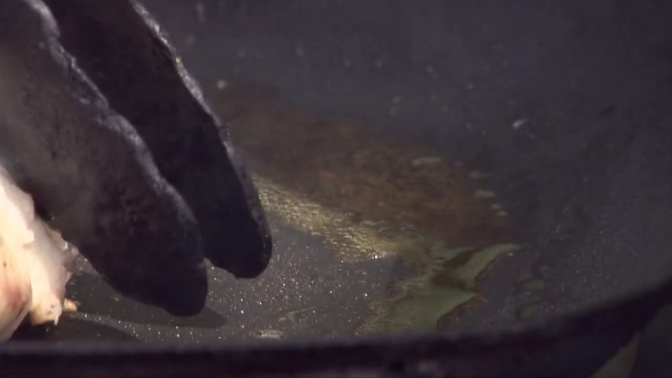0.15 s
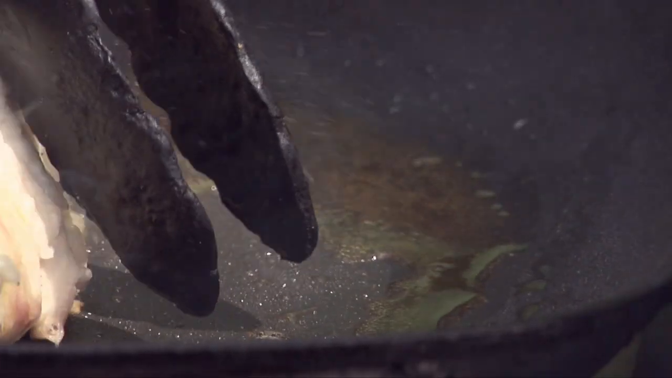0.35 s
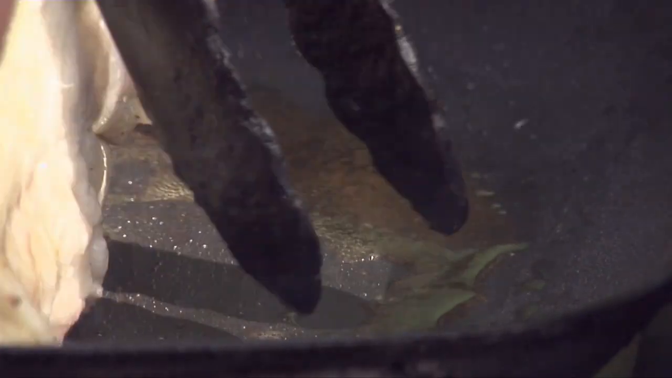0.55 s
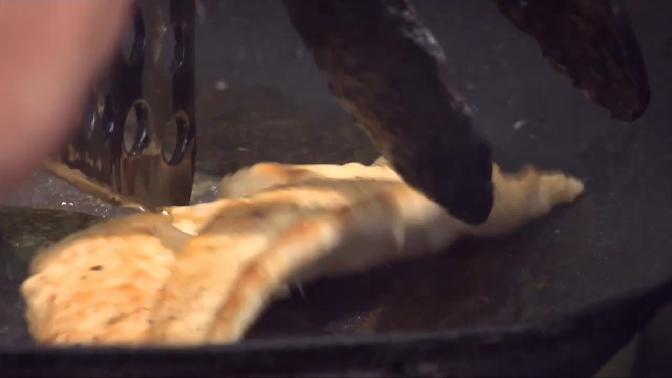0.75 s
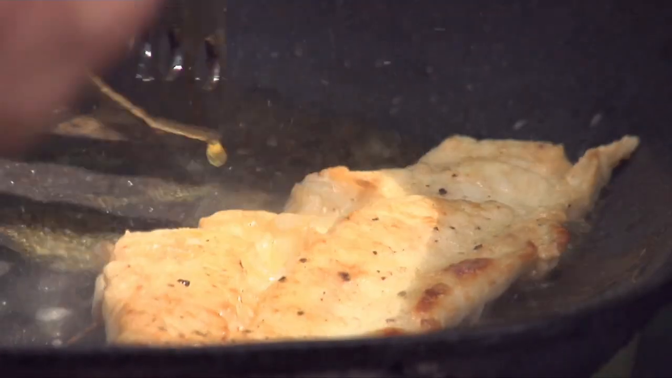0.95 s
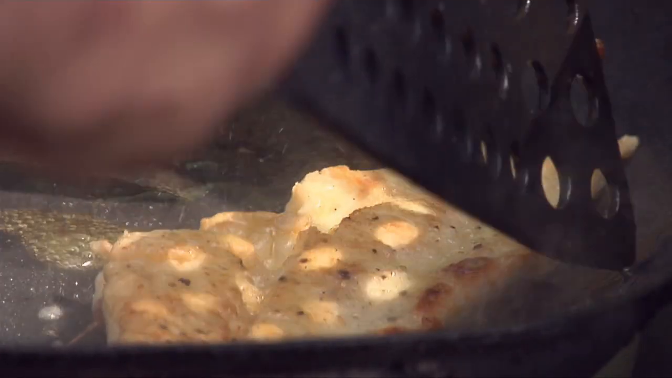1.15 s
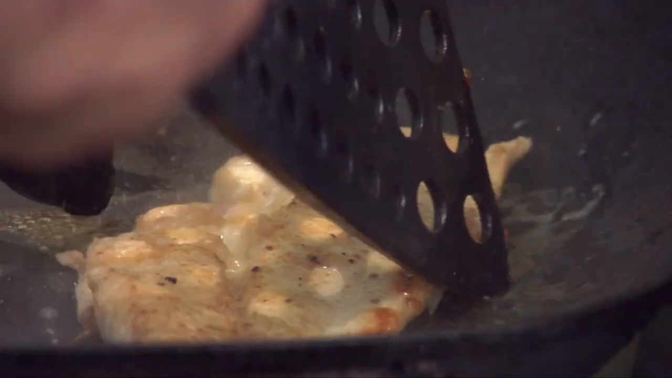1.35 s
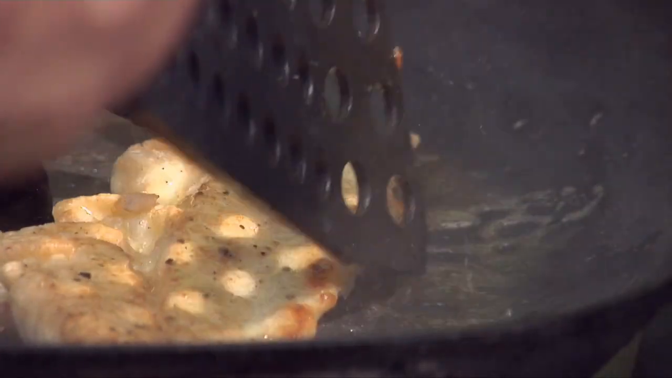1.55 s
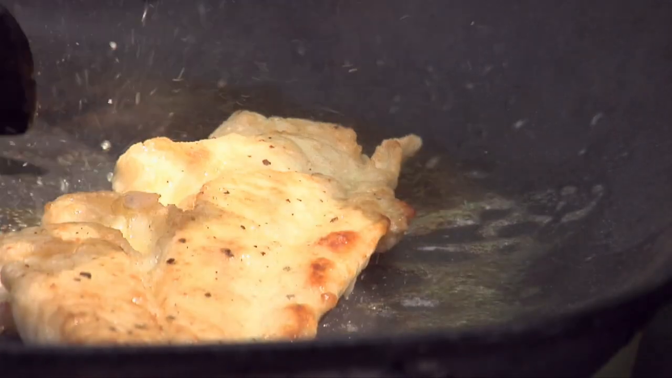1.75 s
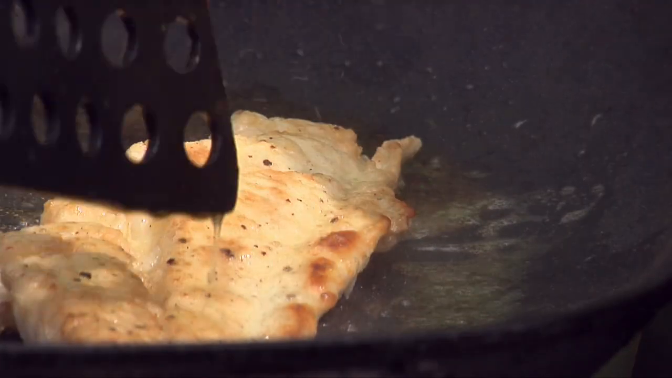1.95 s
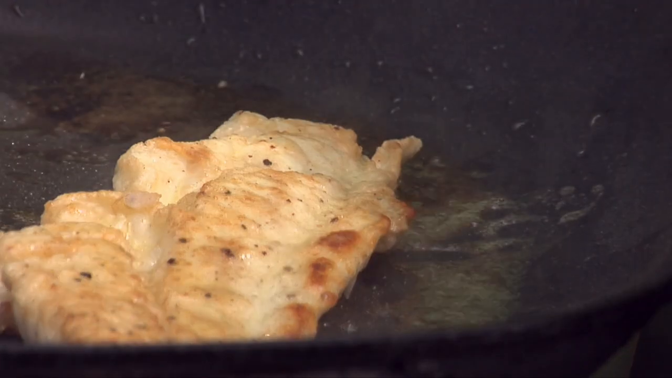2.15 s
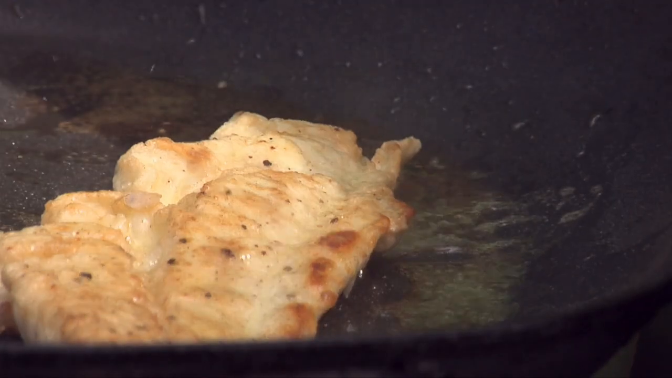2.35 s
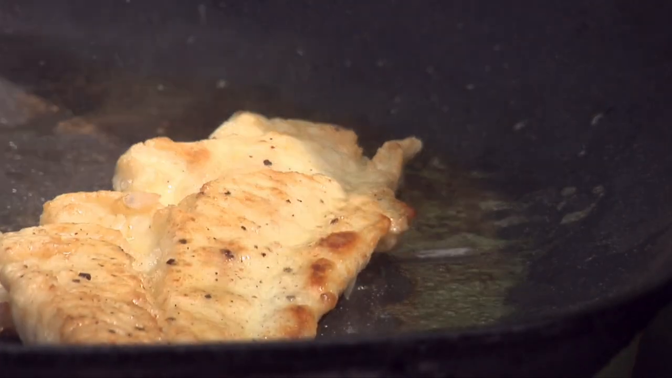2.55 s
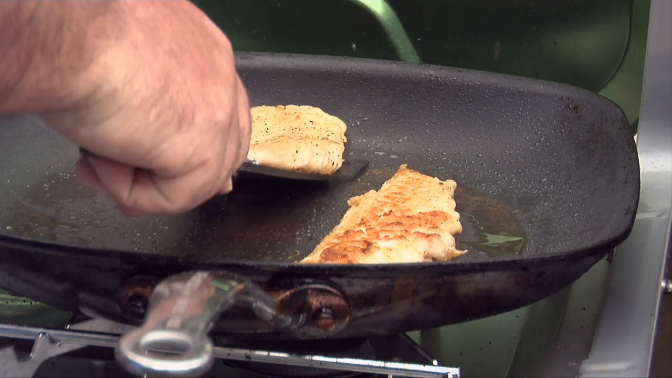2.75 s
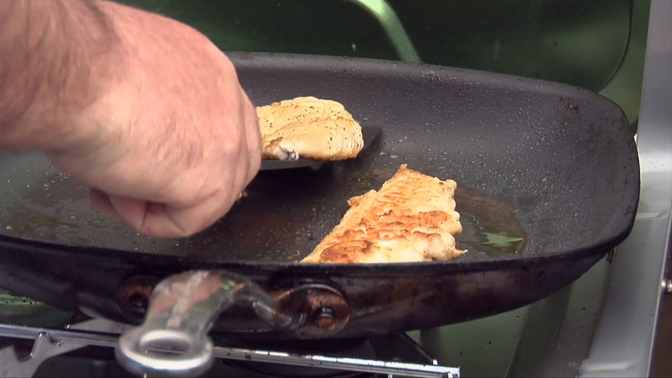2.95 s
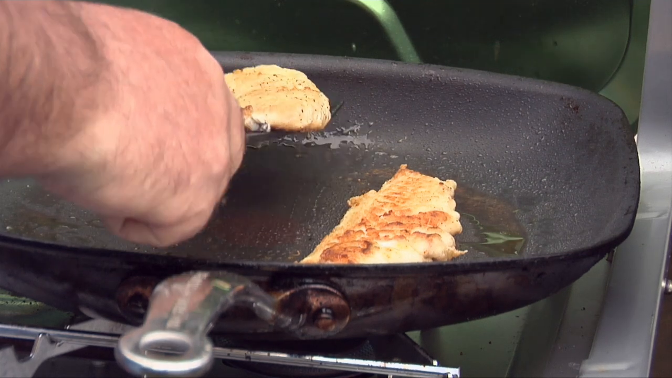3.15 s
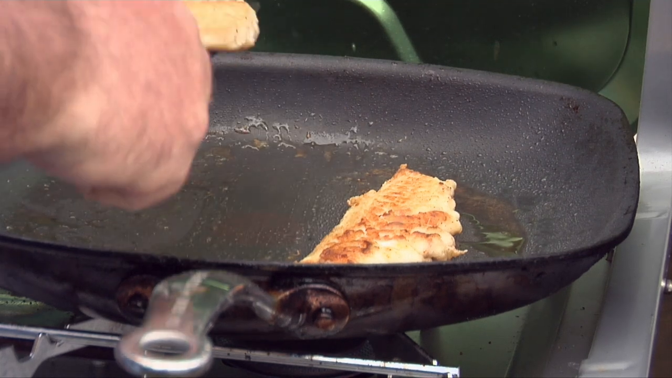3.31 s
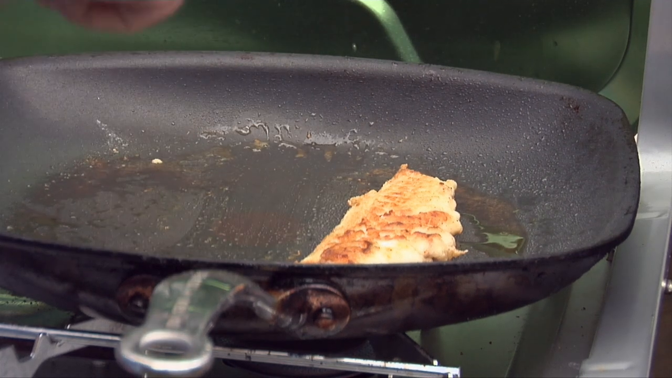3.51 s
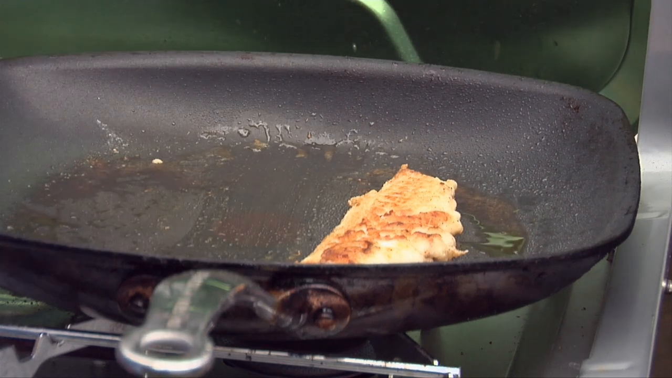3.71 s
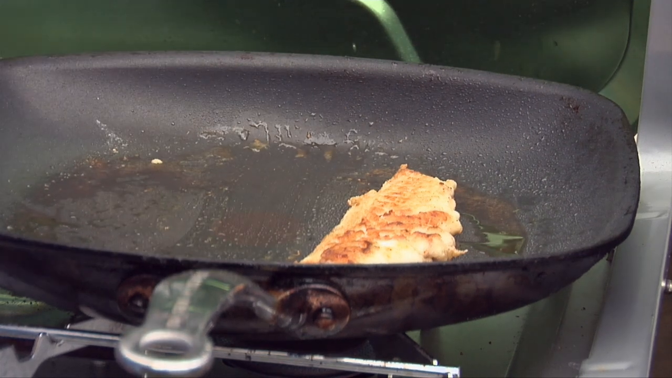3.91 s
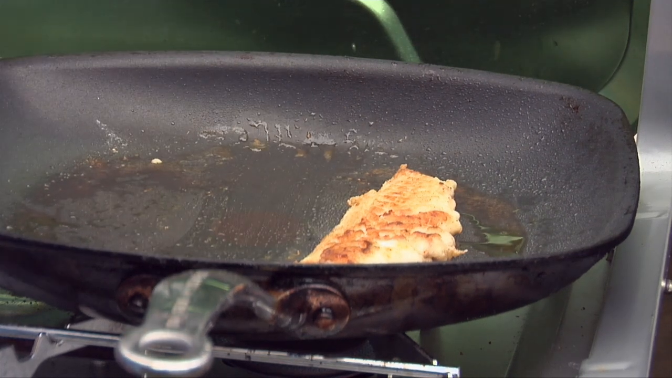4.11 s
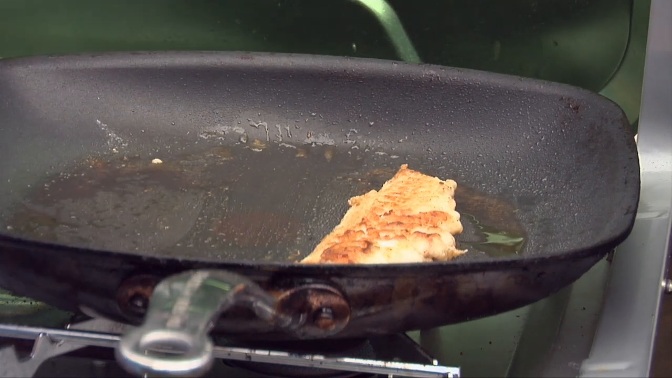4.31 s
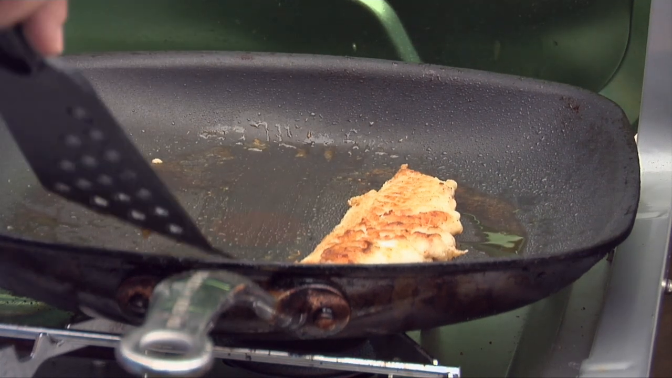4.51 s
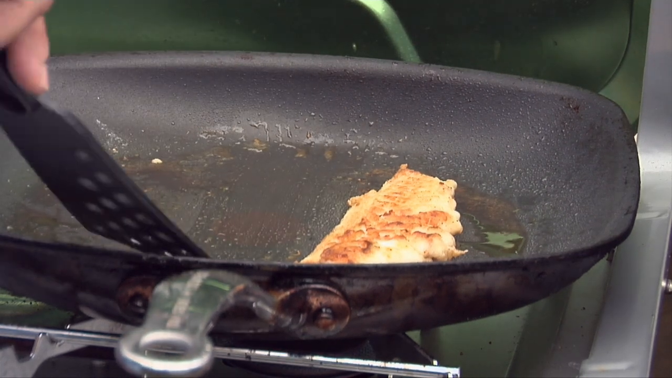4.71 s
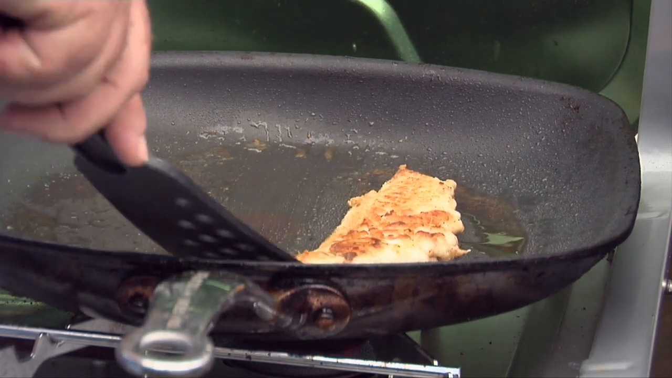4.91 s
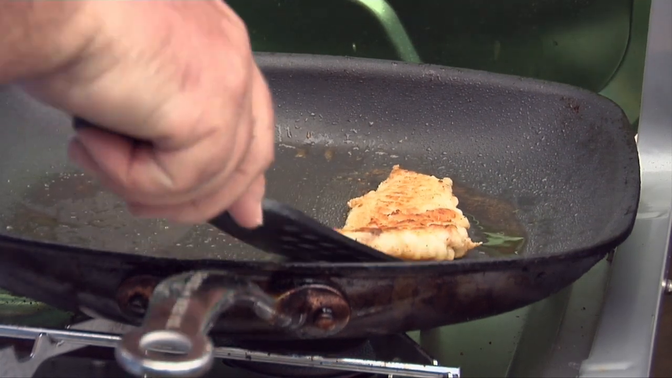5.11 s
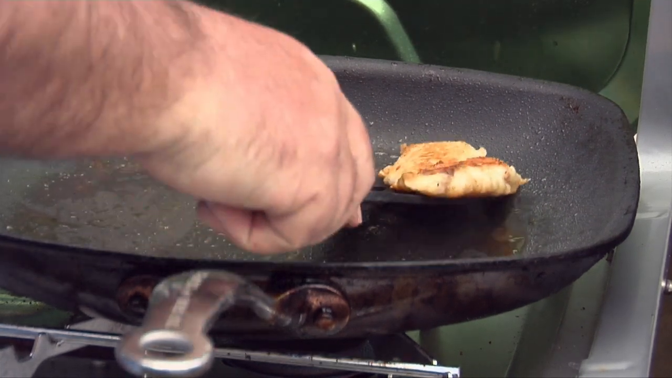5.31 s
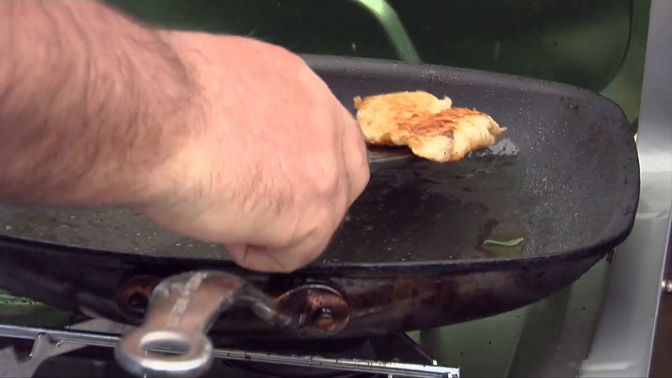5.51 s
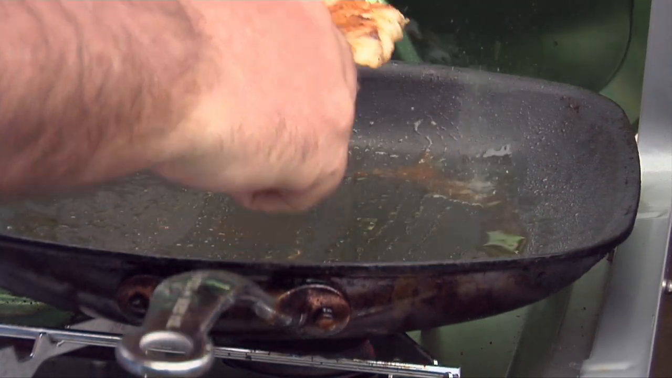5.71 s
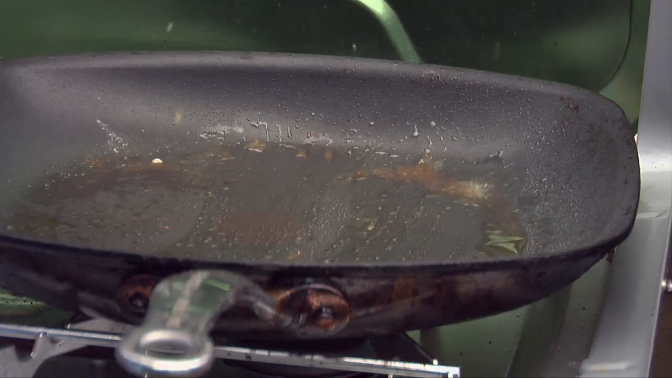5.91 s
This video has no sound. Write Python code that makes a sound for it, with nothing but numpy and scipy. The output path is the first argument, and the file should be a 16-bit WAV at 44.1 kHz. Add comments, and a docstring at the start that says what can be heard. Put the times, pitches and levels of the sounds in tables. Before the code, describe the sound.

Fish sizzles in hot oil from the start, very close, a dense bright hiss above the low roar of a gas flame. Sharp snaps and tiny steam chirps come around 0.5 seconds. At 0.8 seconds the sizzle flares loudly as the fillet is turned, stays strong, and swells again near 1.4 and 2.4 seconds.

At about 2.6 seconds the sound shifts abruptly a step back: the flame becomes much quieter and the frying grainier. After a brief flare near 2.9 seconds it settles to a lighter crackle, with frequent pops and snaps of spitting oil. From 4.7 to 5.7 seconds a spatula makes several short, light scrapes on the pan, and the sizzle rises briefly around 5.6 and 5.8 seconds as the fish is lifted. A soft outdoor hiss runs underneath, with faint wind rumbles on the microphone mostly between 3 and 4.5 seconds.

```python
"""A dense sizzle, close by: fish fillets fry in oil and butter in a pan on an outdoor gas stove.
Countless tiny steam bursts make the sound, which flares when a fillet is turned, pressed or lifted.
Drops spit and snap, steam jets chirp, and from a step further back a spatula is heard scraping the pan.
Beneath it the turbulent flame roars, the open air hisses and gusts touch the microphone.
The sharpest snaps duck a limiter."""
import sys
import numpy as np
from scipy import signal
from scipy.fft import rfft, irfft, next_fast_len
from scipy.io import wavfile
from scipy.ndimage import uniform_filter1d, map_coordinates

SR = 44100
rng = np.random.default_rng(int(sys.argv[2]) if len(sys.argv) > 2 else 0)


def digitize_waveform(pressure):
    """Quantize a signal to 16-bit integers and store it at the path in sys.argv[1].

    Rows of a 2-D input are taken as channels; values are limited to [-1, 1].
    """
    field = np.atleast_2d(pressure).T
    bounded = np.clip(field, -1, 1)
    quanta = np.round(bounded * 32767).astype(np.int16)
    wavfile.write(sys.argv[1], SR, quanta)


N = 263277

STEP_BACK_S = 2.645  # the listener moves away from the pan
NEAR_SIMMER_DB, FAR_SIMMER_DB = (-38, -39.5, -42), (-39.5, -45.5, -45)  # oil alone: body, spatter, fizz


# Spectra of the oil, near and far. Each row: frequency in Hz, relative level in dB.
NEAR_OIL_SPECTRUM = [(700, -23.5), (1300, -15), (1650, -7), (2250, -6.5), (2800, -10.5), (3600, -7.5),
                     (4800, -4.5), (6100, -4.5), (7000, -1.5), (8200, -4.5), (10500, -2.5), (13000, -4.5),
                     (15800, -9)]
FAR_OIL_SPECTRUM = [(700, -14.5), (1300, -1.5), (2000, -0.5), (2800, -7), (3600, -2.5), (4600, -1),
                    (5500, -2.5), (7200, 1), (8500, -0.5), (11500, 2), (14000, -2.5), (15800, -6)]
def sizzle():
    """Shot noise: the harder the oil fries, the faster its steam bursts come and the more they merge."""
    body_gain, spatter_gain, fizz_gain = frying_gains()
    vigour = body_gain / amp(by_distance(NEAR_SIMMER_DB[0], FAR_SIMMER_DB[0]))
    bursts_per_s = np.minimum(by_distance(1700, 520) * vigour ** 1.3, 15000)
    bursts = steam_bursts(bursts_per_s)
    near = pan_wall(coloured(bursts, NEAR_OIL_SPECTRUM))
    far = coloured(bursts, FAR_OIL_SPECTRUM)
    sound = by_distance(unit(near), unit(far))
    below = lambda hz, edge_hz: 1 / (1 + (hz / edge_hz) ** 8)
    spatter = filtered(sound, lambda hz: below(hz, 3200))
    fizz = filtered(sound, lambda hz: 1 - below(hz, 9000))
    body = sound - spatter - fizz
    return body_gain * unit(body) + spatter_gain * unit(spatter) + fizz_gain * unit(fizz)


# Moisture meets hot oil as the fish is turned, pressed and lifted. Each row: start, rise and hold
# in seconds, fall in dB per second, level in dB, brightness in dB (more fizz, less spatter).
FLARE_UPS = [(.26, .05, .19, 100, -34, 3), (.62, .18, .02, 60.5, -33, 5), (.818, .015, .025, 45, -22, -1),
             (.82, .08, 1.0, 13, -27.5, -0.5), (1.381, .09, .3, 32, -27, -4),
             (1.92, .07, .04, 70, -29.5, 2.5), (2.37, .16, 0.05, 60, -27.5, -1.2),
             (2.74, .16, .17, 137, -32, -3.3), (5.0, .12, .25, 60.5, -40.5, -5.5),
             (5.433, 0.0402, .12, 60, -43, -10), (5.567, .06, .08, 70, -31, 4),
             (5.779, .08, .1, 62, -34, 4)]
def frying_gains(spatter_db=-9.5, fizz_db=-3.5):
    """Incoherent sources add in power: simmer plus flares, for mid body, low spatter and high fizz."""
    t = clock()
    power = by_distance(amp(NEAR_SIMMER_DB)[:, None], amp(FAR_SIMMER_DB)[:, None]) ** 2
    for start, rise_s, hold_s, fall_db_per_s, db, bright_db in FLARE_UPS:
        attack = np.clip((t - start) / rise_s, 0, 1)
        decay = amp(-fall_db_per_s * np.maximum(t - start - rise_s - hold_s, 0))
        band_gains = amp([db, db + spatter_db - bright_db, db + fizz_db + bright_db])
        power += np.outer(band_gains, attack * decay) ** 2
    return np.sqrt(power)


def steam_bursts(rate):
    """Superposition: bursts and bubbles over a finer hiss, bunched by random amplitude modulation."""
    clumps = amp(0.79 * wobble(160) + 0.11 * wobble(29.63))
    grains = crackle(rate, spread_db=6, life_s=.000077)
    wet = amp(-11) * bubbles(rate / 4, centre_hz=4800, cycles=7.3)
    singing = amp(-12) * bubbles(np.sqrt(rate) * 3, centre_hz=5800, cycles=30, size=1400)
    smallest = crackle(rate / 2, spread_db=5, life_s=.00006)
    ticks = amp(-4) * filtered(smallest, lambda hz: hz ** 4 / (hz ** 4 + 9000 ** 4))  # top octave
    hiss = amp(-1.5) * rng.standard_normal(N)
    return patchy(clumps * (grains + wet + singing + ticks + hiss), depth_db=1.1)


def crackle(rate, spread_db, life_s, size=96):
    """A Poisson process of decaying noise grains, rate per second; the mean power is 1 at any rate."""
    at = np.flatnonzero(rng.random(N) < rate / SR)
    strength, life = np.clip(rng.standard_normal((len(at), 2)), -2, 2).T
    age = np.arange(size) / SR
    grains = rng.standard_normal((len(at), size)) * np.exp(-age / (life_s * np.exp(life))[:, None])
    grains *= (amp(spread_db * strength) / np.sqrt(rate[at]) / np.linalg.norm(grains, axis=1))[:, None]
    return overlap_add(at, grains)


def bubbles(rate, centre_hz, cycles, size=320):
    """Each bubble is a damped oscillator with its own pitch, falling to 1/e in the given cycles."""
    at = np.flatnonzero(rng.random(N) < rate / SR)
    strength, pitch = np.clip(rng.standard_normal((2, len(at), 1)), -2, 2)
    turns = centre_hz * np.exp(.4 * pitch) * np.arange(size) / SR
    rings = np.sin(2 * np.pi * turns) * np.exp(-turns / cycles)
    return overlap_add(at, amp(2.8 * strength) * rings / np.sqrt(rate[at, None]))


def patchy(x, depth_db):
    """Spectral modulation: the colour shifts in small patches as the bursts move about the pan."""
    spectrogram = signal.stft(x, nperseg=512)[2]
    field = uniform_filter1d(rng.standard_normal(spectrogram.shape), size=8, axis=0)
    field = uniform_filter1d(field, size=9, axis=1)
    return unit(signal.istft(spectrogram * amp(depth_db * unit(field)), nperseg=512)[1][:N])


def pan_wall(x, echo=.22, delay_s=.001535):
    """Comb filtering: a dull early reflection from the pan's wall interferes with the direct sound."""
    return filtered(x, lambda hz: 1 - echo * np.exp(-2j * np.pi * hz * delay_s) / (1 + (hz / 4500) ** 2))


def droplets(count=240):
    """Narrow-band transients: small drops spit at random, louder as the oil fries harder, up to a cap."""
    track = np.zeros(N)
    frying_db = 20 * np.log10(frying_gains()[0])
    for when, smallness, pitch, life in rng.random((count, 4)):
        at = int(when * N)
        db = min(frying_db[at], -35.5) + 7 - 9 * smallness
        sound = spit(.0011 + .0032 * life, centre_hz=4500 + 10000 * pitch, q=4.4)
        add(track, at / SR, amp(db) * sound)
    return track


# Large spitting drops. Each row: start in seconds, level in dB, decay time in seconds.
LARGE_DROPS = [(0.546, -19.5, 0.0015), (2.921, -37, 0.00078), (2.949, -21.5, .0029), (2.996, -28, .0025),
               (3.0563, -24, 0.0015), (3.077, -26, 0.0014), (3.26, -26.5, .0021), (3.338, -20.5, 0.0062),
               (3.4017, -26.5, 0.0032), (3.6465, -24, 0.0066), (3.707, -25.5, 0.0027), (3.739, -24, 0.005),
               (3.864, -26.5, .0045), (4.1135, -21.5, 0.0041), (4.274, -23.5, 0.003),
               (4.441, -26.5, 0.0025), (4.559, -22, 0.0019), (4.674, -26, .0041), (4.773, -25, .0016),
               (4.892, -25, 0.0046), (5.2737, -24, 0.006), (5.311, -20.5, 0.002), (5.357, -23, 0.0057),
               (5.378, -23.5, 0.0029), (5.444, -22, .0055), (5.9005, -26, 0.0048)]
def pops(count=26):
    """Broadband transients: large drops spit, joined after the step back by lesser ones at random."""
    track = np.zeros(N)
    lesser = [(STEP_BACK_S + when * (N / SR - STEP_BACK_S), -27.5 - 7 * smallness, .0026 * (.5 + life))
              for when, smallness, life in rng.random((count, 3))]
    for start, db, decay_s in LARGE_DROPS + lesser:
        add(track, start, amp(db) * spit(decay_s, centre_hz=5650, q=1))
    return track


def spit(decay_s, centre_hz, q):
    """Band-passed decay: a drop cracks and tears into spray, with the energy of 3 ms at rms 1."""
    t = np.arange(SR // 40) / SR
    hz = np.fft.rfftfreq(len(t), 1 / SR) + 1
    envelope = np.exp(-t / decay_s) + .54 * np.exp(-t / .00019)
    spray = envelope * rng.standard_normal(len(t)) * amp(1.9 * rng.standard_normal(len(t)))
    sound = irfft(rfft(spray) / (1 + 1j * q * (hz / centre_hz - centre_hz / hz)))
    return sound / np.linalg.norm(sound) * np.sqrt(.003 * SR)


# Drops that burst all at once. Each row: start in seconds, initial envelope level in dB.
BURSTING_DROPS = [(.504, 2), (.635, -4), (1.915, -6), (2.1, -3.5), (2.24, -7), (3.055, -9), (3.119, 4),
                  (3.46, 2), (4.555, -1), (4.788, -7), (4.892, 1.5)]
def snaps(hz=9500, decay_s=.00008):
    """Heavily damped oscillation: a sudden burst radiates about one hard pressure cycle."""
    track, t = np.zeros(N), np.arange(SR // 100) / SR
    for start, db in BURSTING_DROPS:
        add(track, start, amp(db) * np.sin(2 * np.pi * hz * t) * np.exp(-t / decay_s))
    return track


# Steam squeezing through the oil. Each row: start in seconds, level in dB, pitch in Hz, rise in seconds.
STEAM_JETS = [(0.129, -31, 4510, 0.0076), (.3, -24, 6490, .0071), (0.51, -20, 3710, .0018),
              (.608, -21.5, 3820, 0.003), (.725, -25, 4090, 0.0043), (0.796, -22, 6700, 0.0034),
              (.829, -30, 3560, 0.0034), (0.841, -13, 5720, 0.0054), (0.906, -22, 3510, 0.0032),
              (3.161, -13, 7070, 0.0012), (3.295, -22, 6300, .0014), (3.344, -20, 2700, 0.00097),
              (3.346, -22.5, 1970, 0.0013), (5.548, -24.5, 6710, 0.0022)]
def chirps():
    """Phase noise: each steam jet sings a brief tone whose phase takes a random walk."""
    track, t = np.zeros(N), np.arange(SR // 10) / SR
    for start, db, hz, rise_s in STEAM_JETS:
        wander = .015 / np.sqrt(rise_s)  # shorter jets are rougher
        phase = 2 * np.pi * hz * t + np.cumsum(wander * rng.standard_normal(len(t)))
        envelope = t / rise_s * np.exp(1 - t / rise_s)
        add(track, start, amp(db) * envelope * np.sin(phase))
    return track


# Modes of the blade against the pan. Each row: frequency in Hz, bandwidth in Hz, relative level in dB.
BLADE_MODES = [(3560, 410, -14), (4670, 200, -11), (5815, 68, -6), (7100, 450, -10), (8850, 830, -9)]
# Spatula strokes. Each row: start and end in seconds, level in dB, centre of the excited band in Hz.
STROKES = [(2.832, 3.097, -53, 4000), (4.692, 4.835, -37, 4700), (4.86, 4.895, -35.5, 3960),
           (5.072, 5.2, -36, 8510), (5.256, 5.386, -32, 4000), (5.463, 5.535, -38, 3500),
           (5.55, 5.737, -31.5, 6600)]
def spatula():
    """Stick-slip friction: the edge catches on the pan in many small slips, and each rings the blade."""
    track, t = np.zeros(N), clock()
    resonance = lambda hz, centre, width: 1j * hz * width / (centre ** 2 - hz ** 2 + 1j * hz * width)
    blade = lambda hz: sum(amp(db) * resonance(hz, centre, width) for centre, width, db in BLADE_MODES)
    slips = crackle(np.full(N, 1100), spread_db=3, life_s=.00005)
    ring = filtered(slips, blade)
    for start, end, db, stroke_hz in STROKES:
        progress = np.clip((t - start) / (end - start), 0, 1)
        envelope = np.sqrt(np.abs(np.sin(np.pi * progress)))
        scrape = unit(filtered(ring, lambda hz: resonance(hz, stroke_hz, stroke_hz / 3)))
        track += amp(db) * envelope * scrape
    return track


# Spectrum of the gas flame. Each row: frequency in Hz, relative level in dB.
FLAME_SPECTRUM = [(20, -47), (45, -51), (70, -36.5), (110, -18), (155, -10.5), (203, -2.5), (262, 0.5),
                  (318, -1.5), (378, -11.5), (462, -5), (535, -9.5), (640, -19.5), (1000, -24.5),
                  (2500, -36.5)]
# The flame's roar, which drops at the step back. Each row: time in seconds, level in dB.
ROAR_LEVELS = [(0, -25.5), (.3, -26), (.8, -27), (1.05, -32), (1.8, -29), (2.2, -31.5), (2.55, -28),
               (2.635, -30.5), (2.66, -41.5), (4.5, -38), (5.97, -40.5)]
def burner():
    """Combustion noise: the flame's turbulence roars in the hollow under the pan."""
    level_db = np.interp(clock(), *np.transpose(ROAR_LEVELS)) + .56 * wobble(14)
    return amp(level_db) * rush(FLAME_SPECTRUM)


# Spectra of the open air, near the pan and a step back. Each row: frequency in Hz, relative level in dB.
NEAR_AIR_SPECTRUM = [(50, -44), (300, -13), (600, -4), (800, -0.5), (1050, -0.5), (1350, -6), (2000, -13),
                     (4000, -12), (12000, -76)]
FAR_AIR_SPECTRUM = [(30, -42), (100, -10), (350, -5), (550, -2.5), (760, 0), (1000, -3), (1300, -5),
                    (2000, -11), (4000, -16.5), (12000, -51)]
# Swells of that wash. Each row: middle and half-width in seconds, boost in dB.
AIR_SWELLS = [(.35, 0.71, 3.5), (1.6, 0.48, 3.5), (2.55, 0.16, 3.5), (2.9, 0.057, 5), (3.42, 0.077, 3.5),
              (3.98, 0.32, 3.5), (4.5, 0.19, 5), (4.75, 0.061, 5.5), (5.55, 0.17, 2.5)]
def open_air():
    """Ambient noise: a broad outdoor wash drifts in level and swells now and then."""
    drift_db = .5 * wobble(12)
    swell_db = sum(db * hump(middle, width) for middle, width, db in AIR_SWELLS)
    wash = by_distance(amp(-37) * rush(NEAR_AIR_SPECTRUM), amp(-36.5) * rush(FAR_AIR_SPECTRUM))
    return amp(swell_db + drift_db) * wash


# Spectrum of wind buffeting. Each row: frequency in Hz, relative level in dB.
BUFFET_SPECTRUM = [(10, 8), (30, -8), (45, 4), (70, -0.5), (120, 0), (300, -17), (1500, -68)]
# Gusts of breeze. Each row: middle and half-width in seconds, level in dB.
BREEZE_GUSTS = [(.2, .35, -57), (2.66, .1, -52), (2.96, 0.12, -44), (3.6, 0.18, -50), (4.13, 0.23, -49),
                (4.42, 0.18, -48), (5.1, 0.11, -55)]
def wind(calm_db=-75):
    """Turbulent pressure fluctuations at the microphone rumble with each gust."""
    breeze = amp(calm_db) + sum(amp(db) * hump(middle, width) for middle, width, db in BREEZE_GUSTS)
    return breeze * amp(1.4 * wobble(8.3)) * rush(BUFFET_SPECTRUM)


def amp(db):
    """Decibels to gain."""
    return 10 ** (np.asarray(db) / 20)


def unit(x):
    """Scale to rms 1."""
    return x / np.sqrt(np.mean(x ** 2) + 1e-20)


def clock():
    """The time of every sample."""
    return np.arange(N) / SR


def by_distance(near, far):
    """A linear crossfade from near to far, over 10 ms at the step back."""
    share = np.clip((clock() - STEP_BACK_S) / .01, 0, 1)
    return near * (1 - share) + far * share


def wobble(rate):
    """Spline interpolation through random knots, rate per second."""
    return map_coordinates(rng.standard_normal(int(N * rate / SR) + 4), [np.arange(N) * rate / SR])


def hump(middle_s, width_s):
    """A Gaussian rise and fall of height 1."""
    return np.exp(-((clock() - middle_s) / width_s) ** 2)


def filtered(x, response):
    """Linear filtering: the spectrum of x times a function of frequency in Hz."""
    size = next_fast_len(N + SR // 2)
    return irfft(rfft(x, size) * response(np.fft.rfftfreq(size, 1 / SR)), size)[:N]


def coloured(x, points, size=2048):
    """A minimum-phase filter of energy 1 whose shape follows (Hz, dB) points."""
    point_hz, point_db = np.transpose(points)
    hz = np.fft.rfftfreq(size, 1 / SR)
    magnitude = amp(np.interp(np.log(hz + 1), np.log(point_hz), point_db))
    cepstrum = irfft(np.log(magnitude))
    causal_fold = np.r_[1, np.full(size // 2 - 1, 2), 1, np.zeros(size // 2 - 1)]
    response = irfft(np.exp(rfft(cepstrum * causal_fold)))
    return signal.fftconvolve(x, response / np.linalg.norm(response))[:N]


def rush(points):
    """Coloured Gaussian noise of rms 1."""
    return unit(coloured(rng.standard_normal(N), points, size=8192))


def add(track, start_s, sound):
    """Superpose a sound on a track."""
    span = track[round(start_s * SR):][:len(sound)]
    span += sound[:len(span)]


def overlap_add(at, grains):
    """Superpose grains, one per row, at their starting samples; rms 1."""
    samples = at[:, None] + np.arange(grains.shape[1])
    return unit(np.bincount(samples.ravel(), grains.ravel(), N)[:N])


def scene():
    """Sound pressures add at one microphone, the same in both channels."""
    oil = sizzle() + droplets() + pops() + snaps() + chirps()
    mono = oil + spatula() + burner() + open_air() + wind()
    return np.array([mono, mono])


def limiter(x, ceiling_db, release_db_per_s):
    """Peak limiting: the gain drops at once on a peak and recovers at a steady rate."""
    peak_db = 20 * np.log10(np.abs(x).max(axis=0) + 1e-9)
    excess_db = np.maximum(peak_db - ceiling_db, 0)
    recovery_db = release_db_per_s * clock()
    return x * amp(recovery_db - np.maximum.accumulate(excess_db + recovery_db))


def record(dry):
    """Peak limiting, then band limiting by a steep low-pass filter."""
    limited = limiter(dry, ceiling_db=-6.5, release_db_per_s=17)
    low_pass = lambda hz: 1 / (1 + (hz / 15920) ** 300)
    return np.array([filtered(channel, low_pass) for channel in limited])


dry = scene()
out = record(dry)
digitize_waveform(out)
```